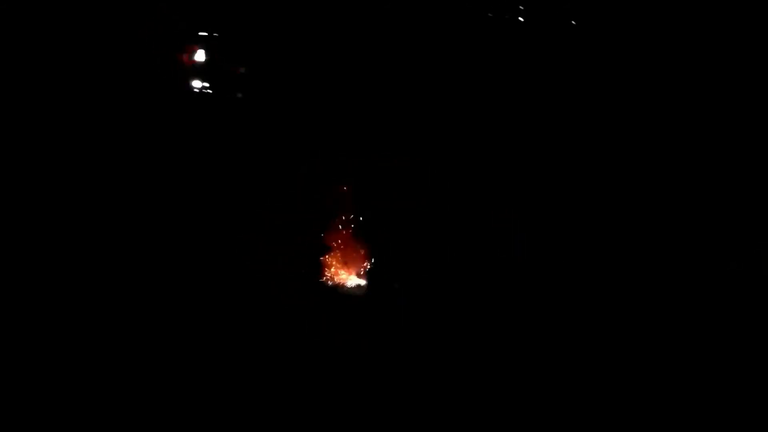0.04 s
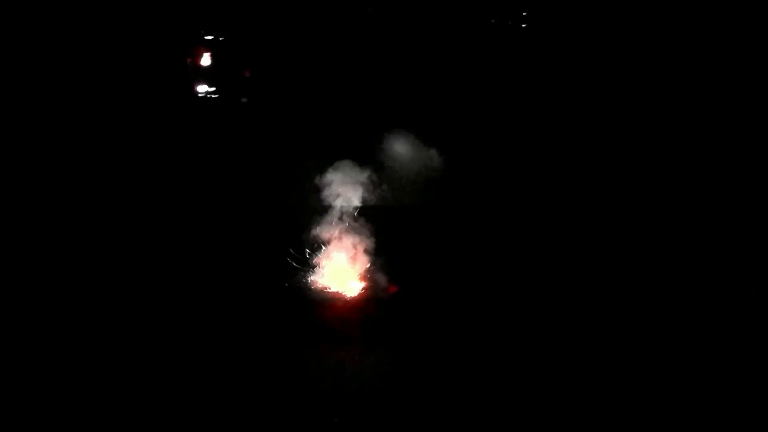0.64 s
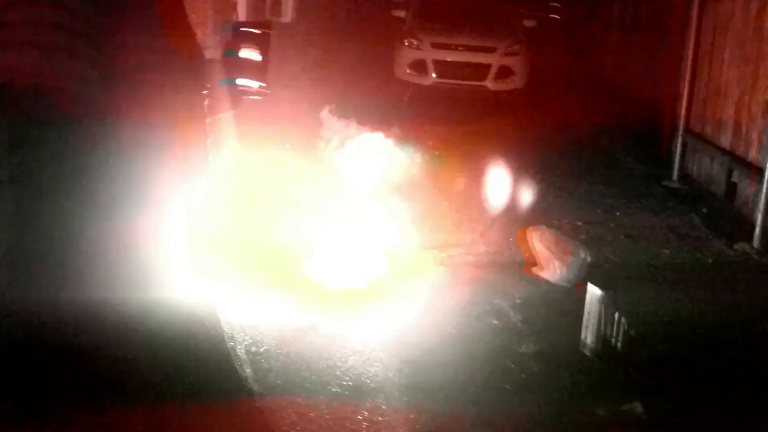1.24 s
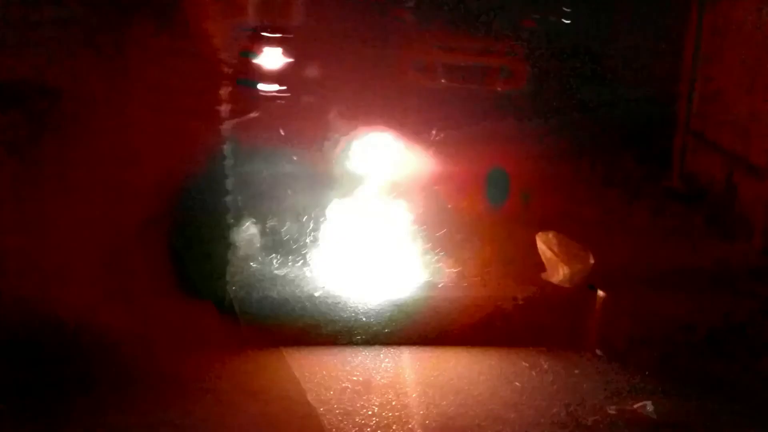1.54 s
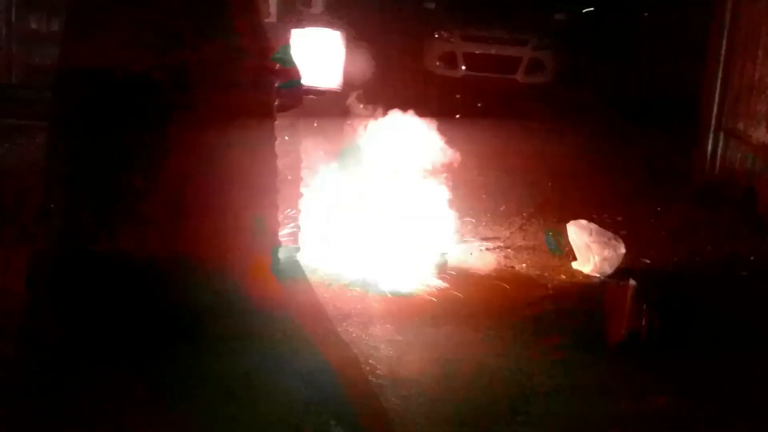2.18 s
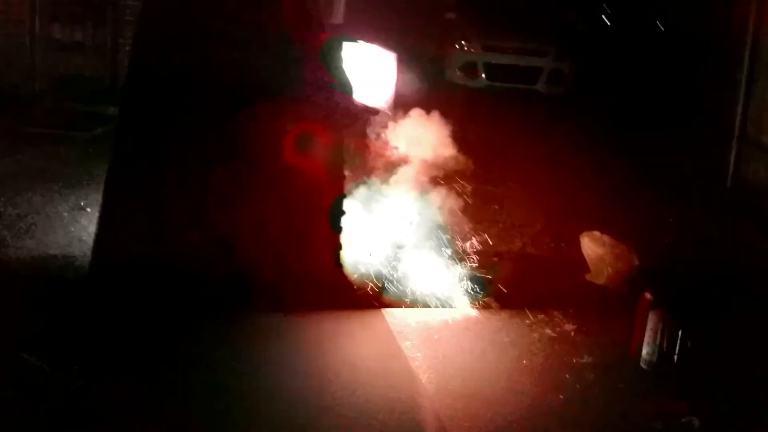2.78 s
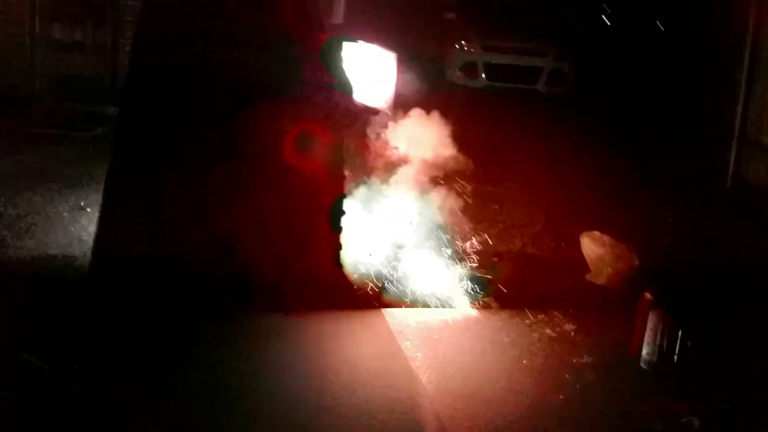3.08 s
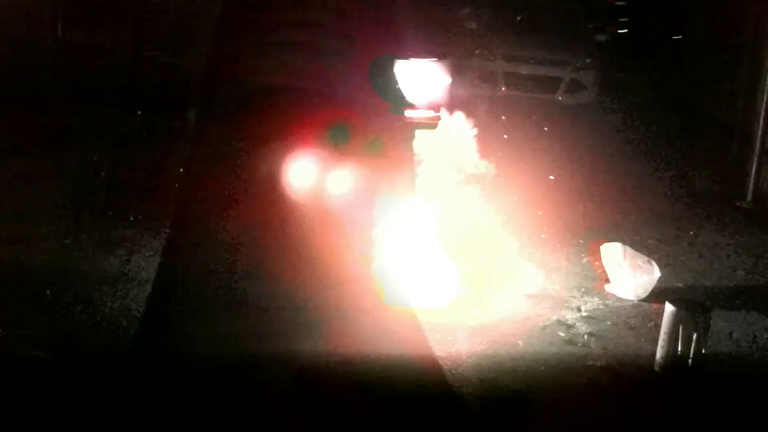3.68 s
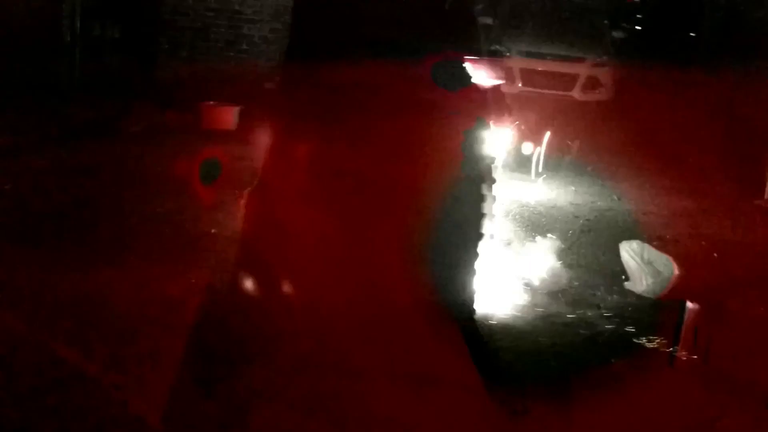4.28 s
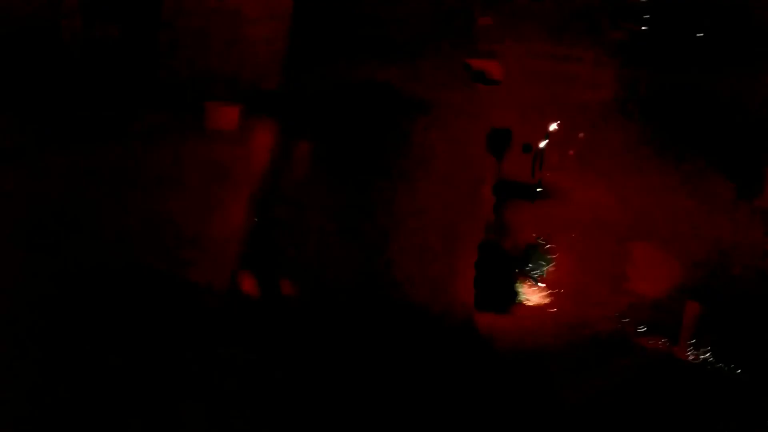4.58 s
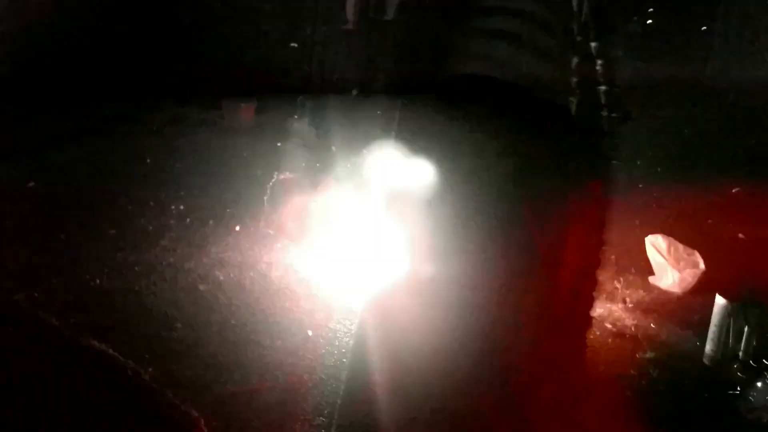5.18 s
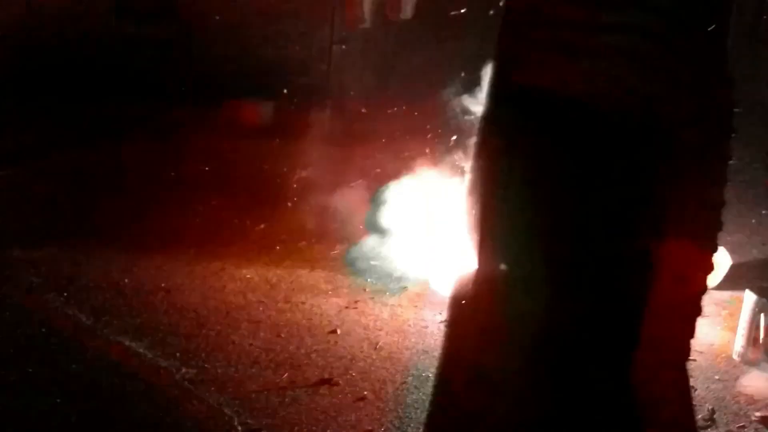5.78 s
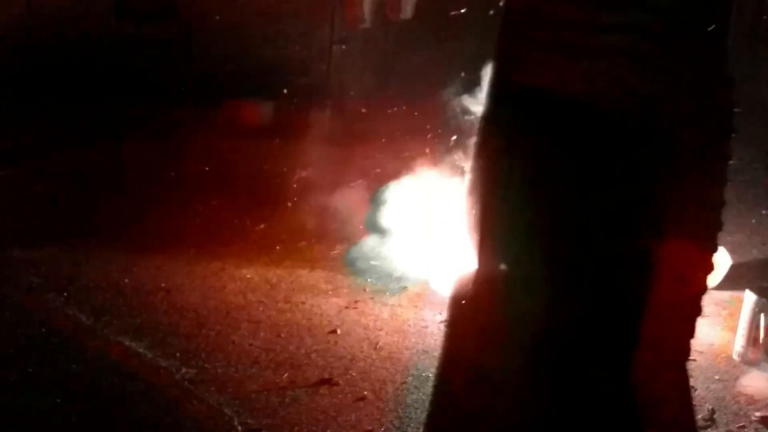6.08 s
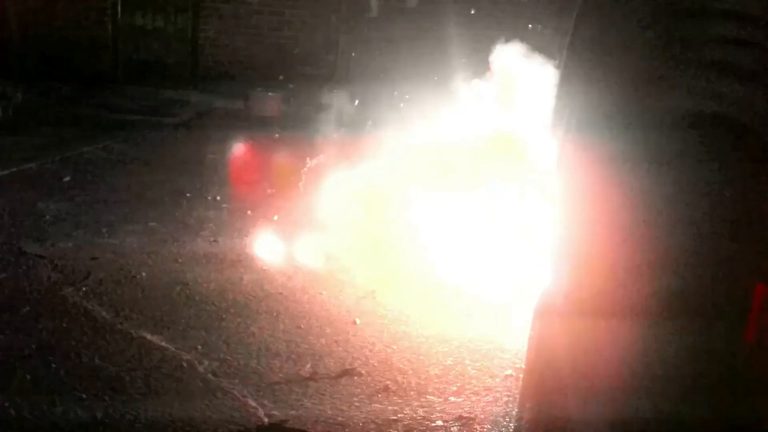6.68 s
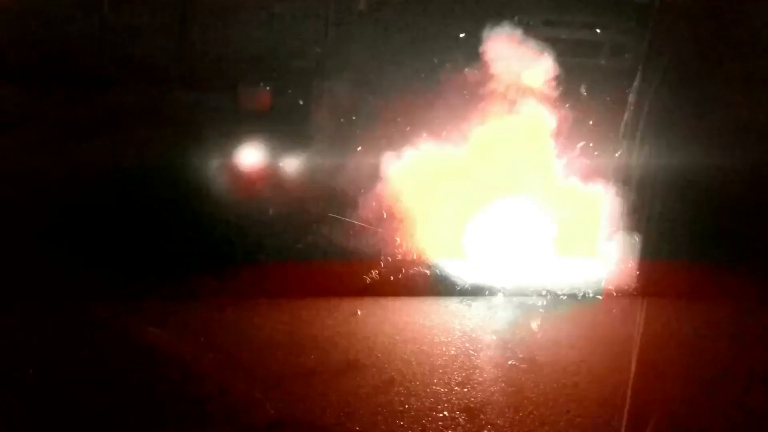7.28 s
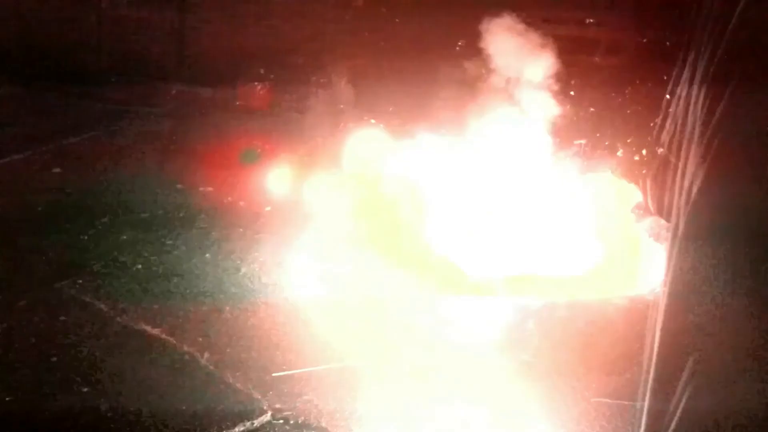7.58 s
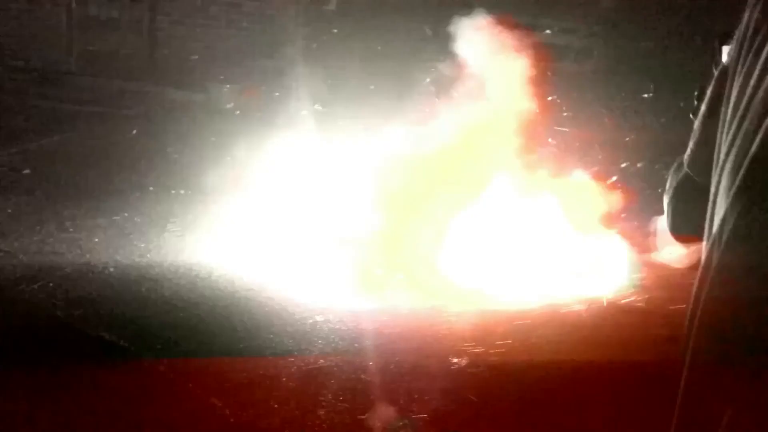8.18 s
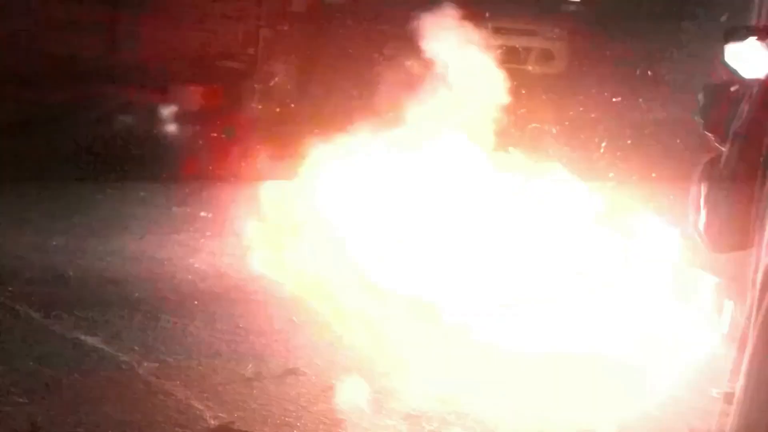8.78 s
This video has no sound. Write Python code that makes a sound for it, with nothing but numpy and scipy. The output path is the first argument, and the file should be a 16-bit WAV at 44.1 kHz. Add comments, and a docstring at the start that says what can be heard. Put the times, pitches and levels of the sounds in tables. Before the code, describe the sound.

Firecrackers burst in rapid succession outdoors at night, starting after a moment of faint rumble. Heavy, thudding bangs pile up unevenly, echoing between the walls of a yard, while smaller crackers merge into a dense crackle that eases midway and then builds to its strongest. The microphone is a few metres off and overloads, so everything sounds muffled and distorted, with a few thin clicks on top.

```python
"""A long string of firecrackers burns in a paved yard between house walls, a few metres away.
At first there is only the low rumble of the night. After half a second the big crackers begin: each sets
off two lesser ones and stirs up the roll of countless small ones, and the walls prolong every blast.
The roll flares early, sinks through the middle and is fiercest near 8 s. Throughout, an overloaded
microphone flattens the bangs, and narrow-band electronics leave them dull with a gritty top."""
import sys
import numpy as np
from scipy import signal
from scipy.fft import rfft, irfft
from scipy.io import wavfile

SR = 44100
rng = np.random.default_rng(int(sys.argv[2]) if len(sys.argv) > 2 else 0)


def output_pcm(signal):
    """Save a mono or channel-first signal as 16-bit PCM at the path in sys.argv[1].

    Samples are clipped to [-1, 1] before scaling.
    """
    pcm = np.clip(np.atleast_2d(signal).T, -1, 1) * 32767
    wavfile.write(sys.argv[1], SR, np.round(pcm).astype(np.int16))


N = 389844
TIME = np.arange(N) / SR
# the biggest crackers: (time [s], relative crack level [dB], relative boom level [dB])
BIG_BANGS = [(0.529, -10.5, 5), (0.5339, -3.5, 1.5), (0.551, -7.5, 0.5), (0.8669, -5, 3.5),
             (0.9128, -5, -2.5), (1.1171, 0.5, 1.5), (1.18, -5, -7.5), (1.2256, -8.5, -13.5),
             (1.5302, -11.5, -1.5), (1.7023, -0.5, -10.5), (1.7811, -11.5, -3.5), (1.8263, -13, -9),
             (2.135, -1.5, -7), (2.18, -6, -12.5), (2.4052, -10, 8.5), (2.461, -6.5, -8),
             (2.6605, -9.5, -7.5), (2.7073, -15.5, -12.5), (2.9521, -1.5, 1), (2.9989, -12, -3),
             (3.1091, -18.5, -10), (3.382, -4, -2.5), (3.4331, -9.5, -3.5), (3.46, -8.5, -7),
             (3.5027, -7.5, -3.5), (3.7782, -8.5, -4.5), (4.2034, -1.5, -6.5), (4.2285, -16, 5),
             (4.3193, -22.5, -3.5), (4.3692, -5, 5), (4.4309, -10, -5), (4.5524, -8, -2.5),
             (4.6043, -13.5, -7.5), (4.99, -3.5, 3.5), (5.0392, -11.5, -14.5), (5.1947, 2.5, -1),
             (5.2584, -17.5, 4.5), (5.3524, -4.5, -1.5), (5.3731, -26, 5), (5.501, -16.5, 1.5),
             (5.5587, -7, 4.5), (5.724, -13.5, 5.5), (5.7809, -3.5, -0.5), (5.8763, -14, -9.5),
             (6.0494, -10, 3.5), (6.078, -13.5, 1), (6.276, -11, -7.5), (6.4575, -6.5, -3),
             (6.6423, -8.5, -12.5), (6.6725, -12, -1.5), (6.7703, -1.5, -5), (6.8131, -7.5, -6.5),
             (6.9114, -6, -10.5), (7.031, -3, -4.5), (7.0791, -13, -5), (7.4871, -2.5, 0.5),
             (7.5372, -10.5, -3.5), (7.7341, -3.5, -1.5), (7.8193, -5.5, -5), (7.9775, -12, -5.5),
             (8.1096, -6.5, -11.5), (8.4251, -2.5, -10), (8.4904, -8.5, -9), (8.545, -6.5, -2.5),
             (8.7323, -11.5, -8)]


def undb(db):
    """Decibels to amplitude ratio."""
    return 10 ** (np.asarray(db) / 20)


def unit(x):
    """Normalisation to rms 1."""
    return x / np.sqrt(np.mean(x ** 2))


def colour(x, points):
    """Minimum-phase filtering through points (frequency [Hz], gain [dB])."""
    hz, db = np.transpose(points)
    grid_hz = np.maximum(np.fft.rfftfreq(8192, 1 / SR), 1)
    gain = undb(np.interp(np.log(grid_hz), np.log(hz), db))
    cepstrum = irfft(np.log(gain))
    half = len(cepstrum) // 2
    causal = np.r_[cepstrum[0], 2 * cepstrum[1:half], np.zeros(half)]
    response = irfft(np.exp(rfft(causal)))
    return signal.fftconvolve(x, response)[:len(x)]


def noise(points):
    """Spectral shaping of white noise, at rms 1."""
    return unit(colour(rng.standard_normal(N), points))


def add(track, s, sound):
    """Superposition: a sound joins the track at time s."""
    start = int(s * SR)
    part = sound[:max(N - start, 0)]
    track[start:start + len(part)] += part


def blast(t, push_s, suction_s):
    """A blast wave of zero net impulse: a short overpressure, then a longer suction of equal area."""
    push = t / push_s * np.exp(1 - t / push_s)
    suction = t / suction_s * np.exp(1 - t / suction_s)
    return push - suction * push_s / suction_s


def night(level_db=-37.5):
    """Ambient noise: a stationary rumble with its energy at low frequencies."""
    # spectrum of the rumble: (frequency [Hz], relative level [dB])
    spectrum = [(10, -27), (22, 4.5), (45, -2), (110, -4), (190, -0.5), (330, -0.5), (430, -3.5),
                (530, -12), (740, -12.5), (840, -5), (920, -11.5), (1080, -10.5), (1400, -28), (1900, -36),
                (4000, -60)]
    return undb(level_db) * noise(spectrum)


def small_crackers(per_s=130, spread_db=3, scatter_s=0.022, roll_db=-3, stir_db=2.5, stir_s=0.064):
    """Shot noise: random pops merge into a roll; the crackers jump about, so each has its own scatter."""
    # how fiercely the small crackers go off: (time [s], relative level [dB])
    fierceness = [(0.56, -10.5), (0.76, -5), (1.05, -15), (1.4, -18), (1.87, -11), (2.35, -20),
                  (2.85, -15.5), (3.22, -19.5), (3.8, -13.5), (4.1, -15), (4.6, -14), (4.93, -16),
                  (5.42, -11), (6.45, -9.5), (6.92, -5.5), (7.35, -11), (7.92, -3.5), (8.84, -8)]
    # spectrum of the roll: (frequency [Hz], relative spectral density [dB])
    spectrum = [(12, -24), (20, 1.5), (49, -10), (90, -0.5), (134, -4.5), (182, -2), (257, -6.5),
                (376, -4.5), (629, -12), (994, -11), (1110, -12), (1660, -27.5), (1790, -25.5), (1900, -50),
                (2470, -69.5), (4180, -120)]
    sizes = undb(spread_db * np.minimum(rng.exponential(size=N), 3))
    pops = sizes * (rng.random(N) < per_s / SR)
    lingering_energy = signal.lfilter([1], [1, -np.exp(-1 / (scatter_s * SR))], pops ** 2)
    scatter = np.sqrt(lingering_energy) * rng.standard_normal(N)
    roll = colour(unit(pops - pops.mean()) + unit(scatter), spectrum)
    s, db = np.transpose(fierceness)
    starts = np.array(BIG_BANGS)[:, 0]
    since_bang = np.abs(TIME - starts[np.searchsorted(starts, TIME) - 1])
    flare_db = stir_db * np.exp(-since_bang / stir_s)  # each big cracker stirs up the roll
    alight = TIME > starts[0]
    return unit(roll) * undb(np.interp(TIME, s, db) + flare_db + roll_db) * alight


def ticks():
    """Impulse response of a bright filter: very short clicks that stick out of a few dull bangs."""
    # thin ticks: (time [s], peak level [dB])
    peaks = [(0.873, -39), (3.5027, -21.5), (3.5115, -24), (4.606, -41), (6.815, -23), (6.8342, -34),
             (7.738, -25), (7.748, -30)]
    # spectrum of a tick: (frequency [Hz], relative level [dB])
    spectrum = [(500, -1), (2000, 16), (3500, 8), (6000, -10), (10000, -63), (14000, -26)]
    click = colour(signal.unit_impulse(256), spectrum)
    out = np.zeros(N)
    for s, db in peaks:
        add(out, s, undb(db) * click / np.abs(click).max())
    return out


def yard(x, t60_s=2.22, tail_db=-7, build_s=0.0037):
    """Reverberation: early reflections off the nearest walls, then a diffuse tail from the houses."""
    # reflections off the nearest walls: (delay [s], share of the pressure [1])
    walls = [(.011, 0.17), (.024, 0.077), (.046, .11)]
    # frequency response of the diffuse tail: (frequency [Hz], gain [dB])
    tail_response = [(20, -14), (70, 1), (190, 3), (400, 0.5), (1000, 2), (2000, -1)]
    early = x.copy()
    for delay_s, share in walls:
        add(early, delay_s, share * x)
    t = TIME[:2 * SR]
    tail = rng.standard_normal(len(t)) * undb(-60 * t / t60_s) * (1 - np.exp(-t / build_s))
    tail = colour(tail / np.linalg.norm(tail), tail_response)
    return early + undb(tail_db) * signal.fftconvolve(x, tail)[:N]


def thuds(thud_db=-8, growth=0.49, dip_s=0.0045, return_s=0.0083):
    """Low-frequency transient: a slow thud under each big bang; a heavier boom leaves a deeper dip."""
    dip = -blast(TIME[:SR // 3], dip_s, return_s)
    out = np.zeros(N)
    for s, _, low_db in BIG_BANGS:
        add(out, s, undb(thud_db + growth * low_db) * dip)
    return out


def charges(neighbours=2, gap_s=0.015, span_s=0.09, crack_db=-22.5, boom_db=-12, spread_db=1.5):
    """Chain ignition: the rows of BIG_BANGS, plus lesser neighbours that each sets off at random."""
    rows = list(BIG_BANGS)
    for s, _, _ in BIG_BANGS:
        for wait, sharp, low in rng.random((neighbours, 3)):
            rows.append((s + gap_s + span_s * wait,
                         crack_db + spread_db * (2 * sharp - 1),
                         boom_db + spread_db * (2 * low - 1)))
    return rows


def big_crackers(blast_db=12.5, push_s=0.00057, suction_s=0.0051, stretch_per_db=0.022,
                 crack_db=9, crack_s=0.0034, boom_db=-1, boom_s=0.02, swell_s=0.0058):
    """Blast waves, each followed by sharp scattering off the paving and a slower boom between walls."""
    # spectrum of the scatter off the paving: (frequency [Hz], relative level [dB])
    crack_spectrum = [(60, -19.5), (250, 6), (600, 1.5), (1050, 7), (1400, -6.5), (1800, -25),
                      (2200, -25.5), (4000, -19.5)]
    # spectrum of the boom between the walls: (frequency [Hz], relative level [dB])
    boom_spectrum = [(15, -10), (40, 1), (90, -5.5), (190, 0.5), (330, -4.5), (600, -15), (1500, -36.5)]
    t = TIME[:SR // 3]
    waves, crack_envelope, boom_envelope = np.zeros((3, N))
    for s, sharp_db, low_db in charges():
        stretch = np.exp(stretch_per_db * (low_db - sharp_db))  # a deeper bang pushes for longer
        add(waves, s, undb((sharp_db + low_db) / 2) * blast(t, push_s * stretch, suction_s * stretch))
        add(crack_envelope, s, undb(sharp_db) * np.exp(-t / crack_s))
        add(boom_envelope, s, undb(low_db) * np.exp(-t / boom_s) * (1 - np.exp(-t / swell_s)))
    cracks = undb(crack_db) * crack_envelope * noise(crack_spectrum)
    booms = undb(boom_db) * boom_envelope * noise(boom_spectrum)
    return undb(blast_db) * waves + cracks + booms


def scene():
    """Superposition of the night's rumble and the crackers in the yard, in one channel."""
    return (night() + yard(big_crackers()) + thuds() + small_crackers())[None]


def overload(x, ceiling, knee, band_hz=1970):
    """Saturation: a narrow-band stage flattens whatever exceeds its ceiling, then cuts the treble."""
    flat = x / (1 + np.abs(x / ceiling) ** knee) ** (1 / knee)
    return signal.fftconvolve(flat, signal.firwin(601, band_hz, fs=SR), "same")


def join_samples(x, sample_hz=6000, oversampling=4):
    """Spectral imaging: slow samples joined by straight lines mirror the band into the treble."""
    instants = np.arange(0, N / SR, 1 / sample_hz)
    samples = np.interp(instants, TIME, x)
    fine_time = np.arange(oversampling * N) / (oversampling * SR)
    joined = np.interp(fine_time, instants, samples)
    return signal.resample_poly(joined, 1, oversampling)


def record(dry, coupling_hz=7, full_scale=0.94, top_hz=14000):
    """Nonlinear distortion: microphone and amplifier overload, then slow sampling; ticks lie on top."""
    microphone = overload(dry[0], ceiling=1.0, knee=2.7)
    coupling = signal.butter(1, coupling_hz, "high", fs=SR, output="sos")
    amplified = overload(signal.sosfilt(coupling, microphone), ceiling=0.92, knee=20)
    clipped = np.clip(join_samples(amplified), -full_scale, full_scale)  # the highest peaks spit
    lowpass = signal.ellip(8, 0.2, 70, top_hz, fs=SR, output="sos")
    return signal.sosfilt(lowpass, clipped + ticks())[None]


dry = scene()
out = record(dry)
output_pcm(out)
```